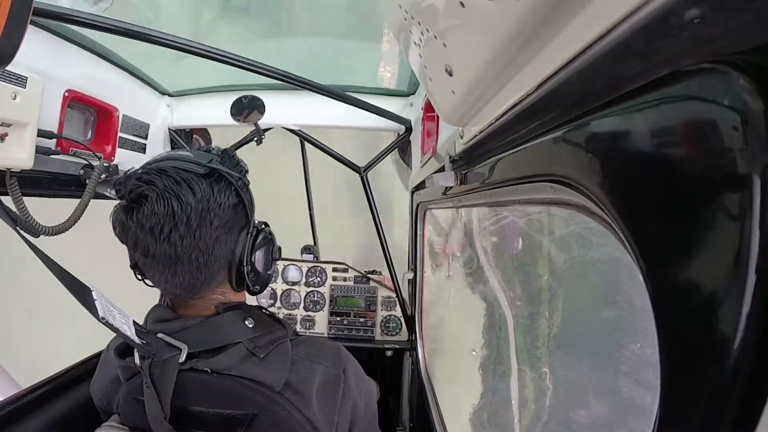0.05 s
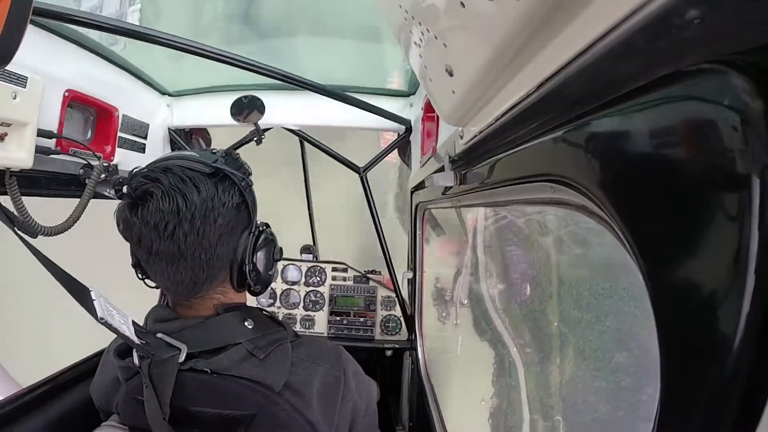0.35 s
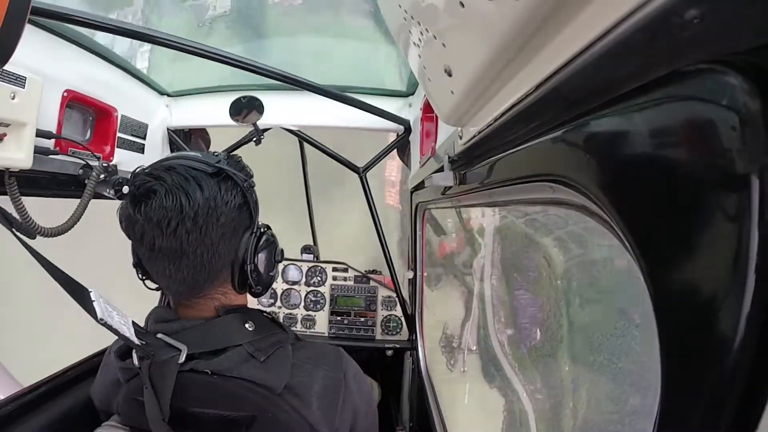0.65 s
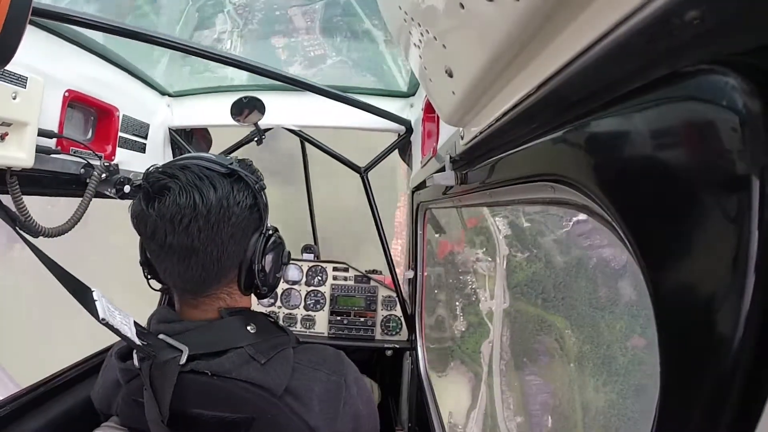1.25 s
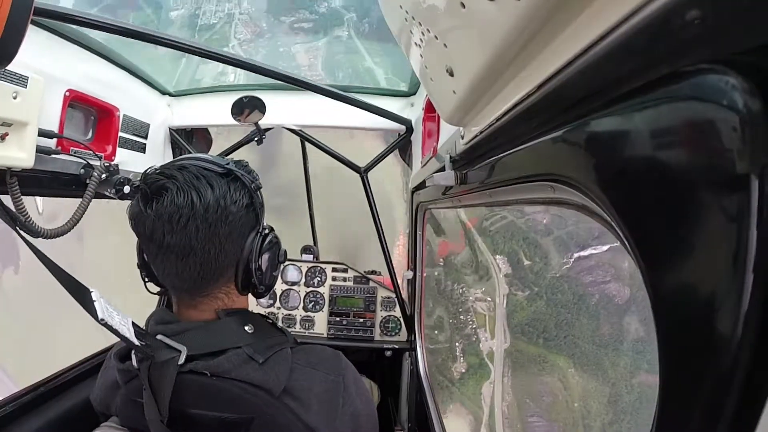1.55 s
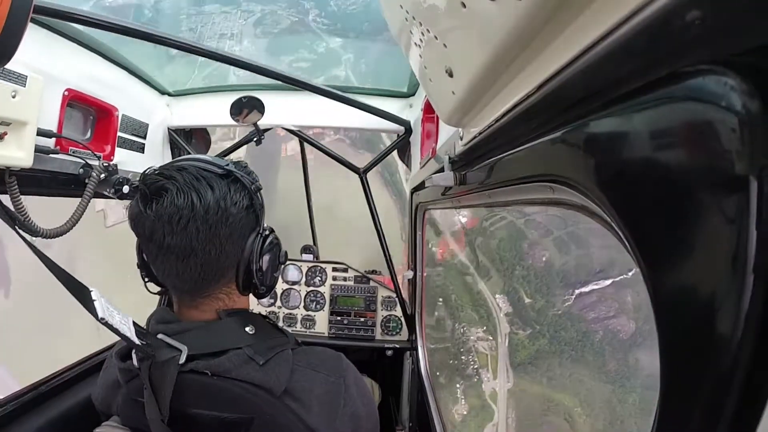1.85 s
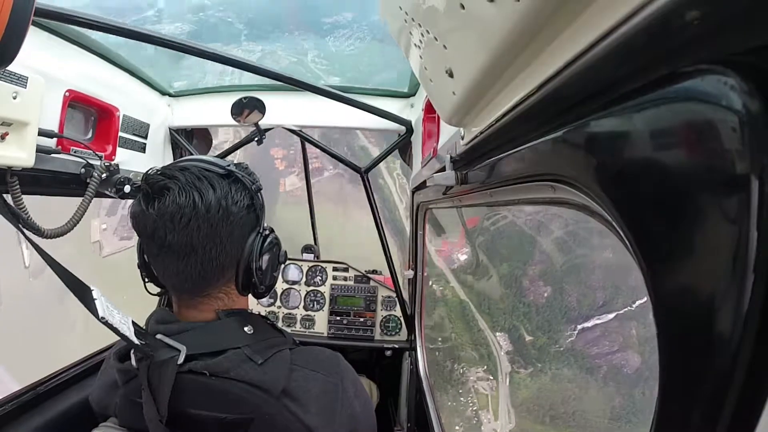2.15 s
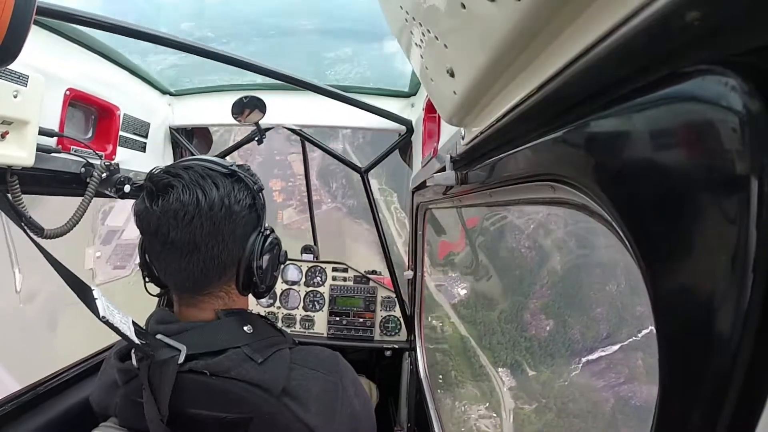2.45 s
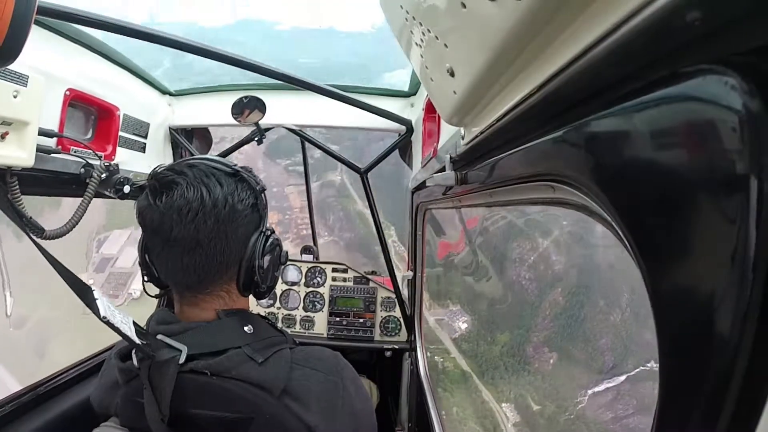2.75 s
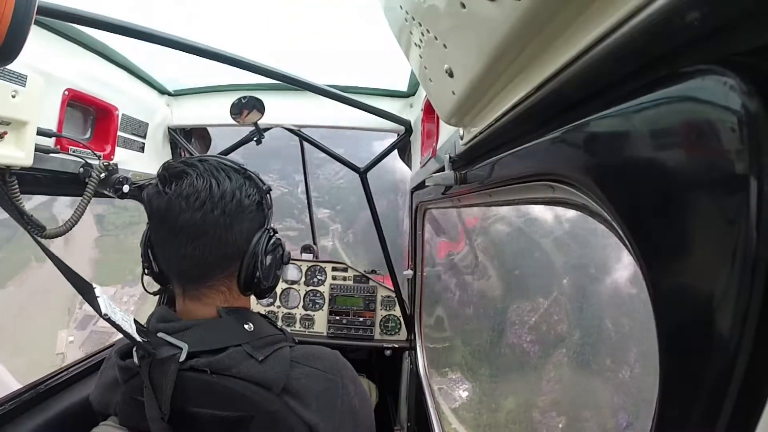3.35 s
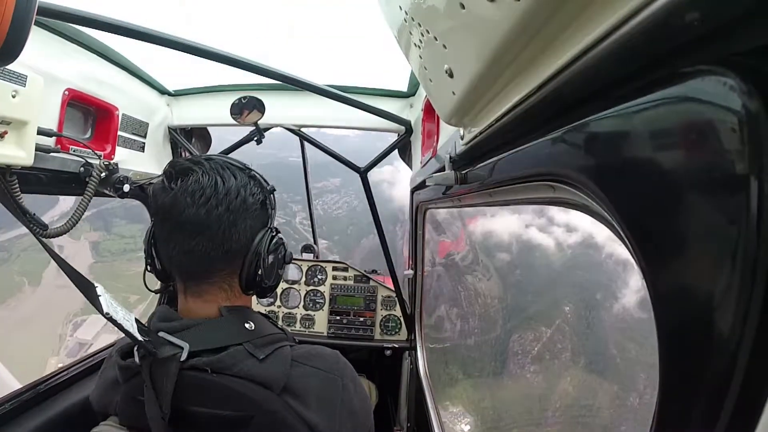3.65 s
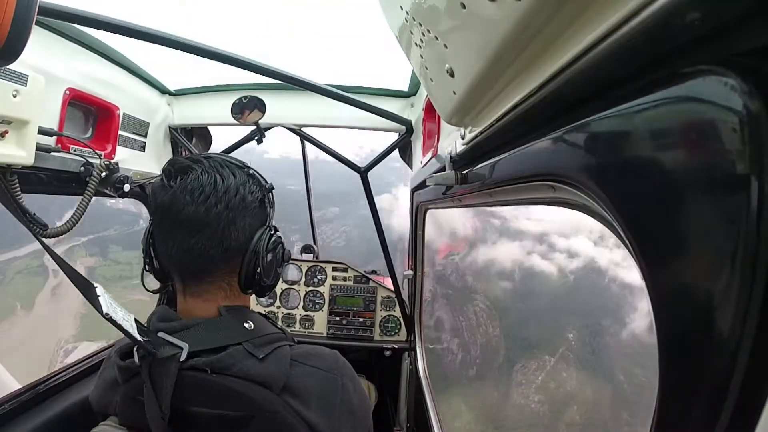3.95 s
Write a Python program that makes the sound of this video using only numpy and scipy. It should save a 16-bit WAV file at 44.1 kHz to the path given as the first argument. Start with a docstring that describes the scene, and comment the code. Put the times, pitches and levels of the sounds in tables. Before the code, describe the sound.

A small plane's piston engine drones at nearly constant speed with a quick throb, heard from inside the cockpit. Wind roars and hisses around the cabin, and a light metallic rattle at the start soon recedes.

```python
"""Inside the cockpit of a light aircraft in a banking turn. From the start a piston engine drones at
nearly steady speed, throbbing about ten times a second under wavering harmonics; its shaft excites metal
clatter and a loose fitting, while the slipstream buffets, roars and hisses and the airframe rumbles.
By one second the clatter has receded and the hiss has dipped. Near 2.5 s the rush of air swells.
At the end it swells again, and the throb is at its deepest."""
import sys
import numpy as np
from scipy import signal
from scipy.fft import rfft, irfft, next_fast_len
from scipy.io import wavfile
from scipy.ndimage import uniform_filter1d, minimum_filter1d, map_coordinates

SR = 44100
rng = np.random.default_rng(int(sys.argv[2]) if len(sys.argv) > 2 else 0)


def digitize_waveform(pressure):
    """Quantize a signal to 16-bit integers and store it at the path in sys.argv[1].

    Rows of a 2-D input are taken as channels; values are limited to [-1, 1].
    """
    field = np.atleast_2d(pressure).T
    bounded = np.clip(field, -1, 1)
    quanta = np.round(bounded * 32767).astype(np.int16)
    wavfile.write(sys.argv[1], SR, quanta)


N = 176400

# rotation of the engine shaft: time_s, rate_hz
SHAFT_SPEED = [(0, 83.7), (.4, 83.8), (.8, 84.4), (1.5, 84.6), (2.3, 84.6), (2.8, 83.9), (3.3, 84.1),
               (4, 83.4)]
# the engine's fundamental: time_s, carrier_level_db, throb_depth (0-1)
FUNDAMENTAL = [(0, -9.5, 0.32), (.35, -7, 0), (.7, -8, 0.2), (1, -10.7, 0), (1.3, -14, 0.4),
               (1.6, -10.5, 0), (1.9, -8.5, .22), (2.3, -12.5, 0.13), (2.6, -9.5, 0.06), (2.9, -10, 0.28),
               (3.25, -9.5, 0.1), (3.55, -12, 0.47), (3.75, -13, 0.4), (3.9, -17, 1), (4, -14.5, .8)]
# modulation of the drone: time_s, rate_hz
THROB_RATE = [(0, 9.8), (.35, 10.5), (.7, 9.9), (1, 10.4), (1.3, 12), (1.6, 7.1), (1.9, 11.1), (2.2, 12.3),
              (2.4, 13), (2.6, 6.8), (2.9, 10.7), (3.25, 12), (3.55, 9.4), (3.75, 7.2), (3.9, 9.9),
              (4, 10.1)]
# firing tone, two cycles per shaft turn: time_s, level_db
FIRING_LEVEL = [(0, -21.5), (.45, -29.5), (.9, -26), (1.3, -29.5), (1.8, -22.5), (2.1, -25), (2.45, -27),
                (2.9, -26), (3.4, -27.5), (4, -29)]
# exhaust harmonics: shaft_multiple, base_level_db
EXHAUST_HARMONICS = [(3, -35), (4, -38.5), (5, -41.5), (6, -40), (7, -48), (8, -45), (9, -45.5),
                     (10, -50.5), (11, -47.5), (13, -54), (14, -50), (15, -48), (16, -51.5), (18, -56)]
# gain shared by the exhaust harmonics and the propeller tone: time_s, gain_db
OVERTONE_GAIN = [(0, 1.5), (.6, 0.5), (1, -4), (1.5, 0.5), (2.6, 2.5), (3.3, -1.5), (4, 0)]
# resonances of the engine's metal parts: pitch_hz, width_hz, relative_db
METAL_MODES = [(770, 70, 7.5), (1326, 44, 6), (1503, 130, 3.5), (2780, 190, -1.5), (4870, 300, -4),
               (7450, 300, -19), (8720, 310, -16.5), (11000, 1800, -28.5)]
# envelopes of the metal parts, loose fitting and airframe: time_s, level_db
CLATTER_ENVELOPE = [(0, -36.5), (.6, -42), (1, -46), (1.5, -44), (2.2, -43), (3, -45.5), (4, -45.5)]
RATTLE_ENVELOPE = [(0, -40), (.6, -48.5), (1, -48), (1.5, -48.5), (2.2, -49.5), (4, -48.5)]
RUMBLE_ENVELOPE = [(0, -24), (.35, -31), (.8, -28), (1.3, -26), (1.8, -32.5), (3, -33), (4, -31.5)]
# relative levels of the slipstream's bands: time_s, buffet_db, roar_db, hiss_db
AIR_ENVELOPES = [(0.0, -25.5, -26.5, -33), (0.3, -22.5, -30, -34.5), (0.65, -26, -30.0, -36.5),
                 (0.95, -24.5, -32, -39), (1.2, -25, -30, -35.6), (1.5, -21.5, -27.5, -33.6),
                 (1.75, -21.0, -28, -33.5), (2.0, -23.5, -28, -34.4), (2.3, -20.9, -27, -33),
                 (2.55, -19, -23.5, -31.5), (2.85, -21.5, -28, -34), (3.3, -24.5, -27.5, -35),
                 (3.6, -21, -26.5, -33.5), (4.0, -19.5, -24, -31.1)]
# noise spectra of the drone's skirt, the air and the airframe: frequency_hz, relative_density_db
SKIRT_SPECTRUM = [(45, -35), (58, -11), (67, -8), (74, -2.5), (84, -2.5), (95, -4.5), (108, -14),
                  (122, -16), (150, -35)]
BUFFET_SPECTRUM = [(90, -34.5), (120, -11.5), (150, -1), (185, -1.5), (222, 3.5), (250, -2), (275, -6),
                   (305, -10.5), (345, -4), (400, -6.5), (480, -11.5), (560, -17.5), (700, -42.5)]
ROAR_SPECTRUM = [(380, -31), (500, 3.5), (560, 0.5), (640, 0.5), (740, 3), (800, -5.5), (870, -1), (930, 1),
                 (1050, 1), (1250, 0.5), (1330, -3.5), (1520, -3.5), (1630, -7), (1770, -3), (1920, -10),
                 (2100, -8), (2350, -20), (2800, -32)]
HISS_SPECTRUM = [(1700, -31.5), (2300, -6.5), (2520, -2), (2900, -1), (3130, 0), (3260, -5.5), (3650, -4),
                 (4000, -12), (4350, -9), (4950, -9.5), (5300, -9), (5750, -10), (6500, -14.5),
                 (6950, -21.5), (7450, -23), (8000, -25.5), (8650, -24.5), (9900, -28.5), (12500, -33.5),
                 (13300, -41.5), (15000, -47.5)]
RUMBLE_SPECTRUM = [(12, -36.5), (20, -15), (24, -5.5), (31, 3.5), (40, -3.5), (46, -11.5), (60, -27.5)]


def amp(db):
    """Amplitude ratio for a level in decibels."""
    return 10 ** (np.asarray(db) / 20)


def unit_rms(x):
    """Normalisation to rms 1."""
    return x / np.sqrt(np.mean(x ** 2) + 1e-20)


def curves(rows):
    """Linear interpolation: one value per sample for each column after the time."""
    time_s, *columns = np.transpose(rows)
    return [np.interp(np.arange(N) / SR, time_s, column) for column in columns]


def wobble(rate_hz):
    """Slow random modulation: a spline through rate_hz Gaussian values a second."""
    return map_coordinates(rng.standard_normal(1024), [np.arange(N) * rate_hz / SR + 2], mode="wrap")


def running_phase(hz):
    """Phase in radians is the time integral of angular frequency."""
    return 2 * np.pi * np.cumsum(hz) / SR


def tone(phase, rms_db):
    """A sinusoid peaks at root two times its rms value."""
    return np.sqrt(2) * amp(rms_db) * np.sin(phase)


def filtered(x, response):
    """Linear filtering multiplies the spectrum by a frequency response."""
    size = next_fast_len(N + SR // 2)
    return irfft(rfft(x, size) * response(np.fft.rfftfreq(size, 1 / SR)), size)[:N]


def resonance(hz, pitch_hz, width_hz):
    """Response of a damped oscillator, squared for steeper skirts."""
    damping = 1j * hz * width_hz
    return (damping / (pitch_hz ** 2 - hz ** 2 + damping)) ** 2


def coloured_noise(spectrum, patchy_db):
    """Spectral shaping of white noise, with random patches of gain in time and frequency; rms 1."""
    cells = signal.stft(rng.standard_normal(N), nperseg=1024)[2]
    patches = uniform_filter1d(rng.standard_normal(cells.shape), size=6, axis=0)
    patches = uniform_filter1d(patches, size=8, axis=1)
    noise = signal.istft(cells * amp(patchy_db * unit_rms(patches)), nperseg=1024)[1][:N]
    knots_hz, db = np.transpose(spectrum)
    colour = lambda hz: amp(np.interp(np.log(hz + 1), np.log(knots_hz + 1), db, left=-120, right=-120))
    return unit_rms(filtered(noise, colour))


def engine_drone(shaft_phase):
    """Amplitude modulation makes the engine's fundamental and its skirt of noise throb together."""
    carrier_db, depth = curves(FUNDAMENTAL)
    throb_hz, = curves(THROB_RATE)
    throb = 1 - depth * np.cos(running_phase(throb_hz))
    skirt = amp(-24.5) * coloured_noise(SKIRT_SPECTRUM, patchy_db=3)
    return throb * (tone(shaft_phase, carrier_db) + skirt)


def engine_overtones(shaft_phase, waver_db=3, waver_rad=0.67):
    """Periodic firing gives harmonics of the shaft rate; blade passage adds an inharmonic tone."""
    firing_db, = curves(FIRING_LEVEL)
    gain_db, = curves(OVERTONE_GAIN)
    tones = tone(2 * shaft_phase + 0.25 * wobble(5), firing_db + 1.2 * wobble(6.5))
    propeller = (1.245, -32.5)  # blade_passages_per_turn, base_level_db
    for multiple, base_db in EXHAUST_HARMONICS + [propeller]:
        phase = multiple * shaft_phase + rng.uniform(0, 2 * np.pi) + waver_rad * wobble(9)
        tones += tone(phase, base_db + gain_db + waver_db * wobble(6.02))
    return tones


def metal_clatter(shaft_phase, sharpness=0.54, unevenness=0.21):
    """Modal resonance: a burst of mechanical noise on every turn rings the engine's metal parts."""
    level_db, = curves(CLATTER_ENVELOPE)
    alternation = 1 + unevenness * np.sin(shaft_phase / 2)  # every other turn is stronger
    bursts = np.exp(sharpness * np.sin(shaft_phase)) * alternation * rng.standard_normal(N)
    metal = lambda hz: sum(amp(db) * resonance(hz, pitch, width) for pitch, width, db in METAL_MODES)
    return amp(level_db + 0.6 * wobble(22)) * unit_rms(filtered(bursts, metal))


def fitting_rattle(shaft_phase, sharpness=0.97, fitful_db=2.5):
    """Forced vibration: shaken once every two turns, a loose fitting chatters on one thin note."""
    level_db, = curves(RATTLE_ENVELOPE)
    shakes = np.exp(sharpness * np.sin(shaft_phase / 2))
    chatter = shakes * amp(fitful_db * wobble(30)) * rng.standard_normal(N)
    fitting = lambda hz: resonance(hz, pitch_hz=3074, width_hz=230)
    return amp(level_db) * unit_rms(filtered(chatter, fitting))


def slipstream(shaft_phase):
    """Airflow over the cabin makes broadband noise; the engine modulates the hiss and, weakly, the roar."""
    buffet_db, roar_db, hiss_db = curves(AIR_ENVELOPES)
    flutter = 0.11 * np.sin(shaft_phase) + 0.036 * np.sin(shaft_phase / 2)
    flutter += 0.09 * np.sin(2 * shaft_phase)  # at the firing rate
    buffet = amp(buffet_db - 2.5 + 0.36 * wobble(17)) * coloured_noise(BUFFET_SPECTRUM, patchy_db=0.8)
    roar = amp(roar_db - 3 + 0.16 * wobble(15)) * coloured_noise(ROAR_SPECTRUM, patchy_db=0.65)
    hiss = amp(hiss_db - 3 + 0.35 * wobble(25.16)) * coloured_noise(HISS_SPECTRUM, patchy_db=1)
    return buffet + roar * (1 + 0.22 * flutter) + hiss * (1 + flutter)


def airframe_rumble():
    """Random vibration of the airframe radiates noise at the lower limit of hearing."""
    level_db, = curves(RUMBLE_ENVELOPE)
    return amp(level_db) * coloured_noise(RUMBLE_SPECTRUM, patchy_db=2)


def scene():
    """Superposition of engine, air and airframe, as heard behind the pilot."""
    shaft_hz, = curves(SHAFT_SPEED)
    shaft_phase = running_phase(shaft_hz)
    engine = engine_drone(shaft_phase) + engine_overtones(shaft_phase)
    metal = metal_clatter(shaft_phase) + fitting_rattle(shaft_phase)
    return (engine + metal + slipstream(shaft_phase) + airframe_rumble())[None]


def record(dry, ceiling_db=-1, knee=3.75, cutoff_hz=15100):
    """Soft limiting rounds off the tallest peaks; a low-pass filter then bounds the bandwidth."""
    peak_ratio = np.abs(dry[0]) / amp(ceiling_db)
    needed_gain = 1 / (1 + peak_ratio ** knee) ** (1 / knee)
    held_gain = minimum_filter1d(needed_gain, size=600)
    smooth_gain = uniform_filter1d(held_gain, size=500)
    return filtered(dry[0] * smooth_gain, lambda hz: hz < cutoff_hz)[None]


dry = scene()
out = record(dry)
digitize_waveform(out)
```